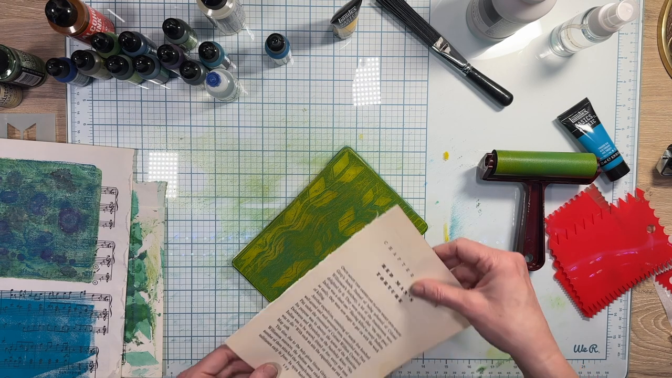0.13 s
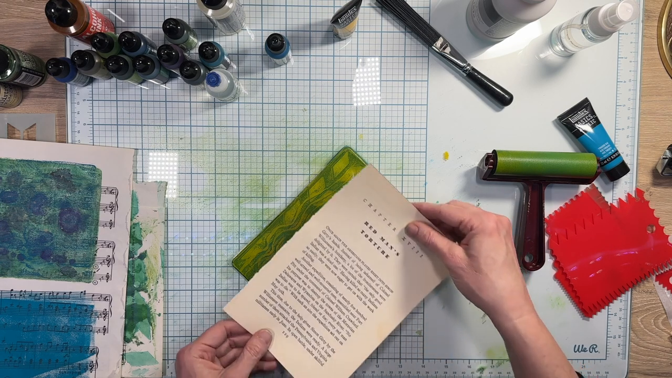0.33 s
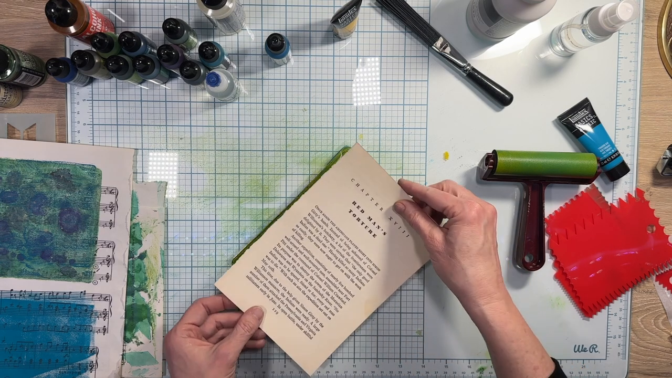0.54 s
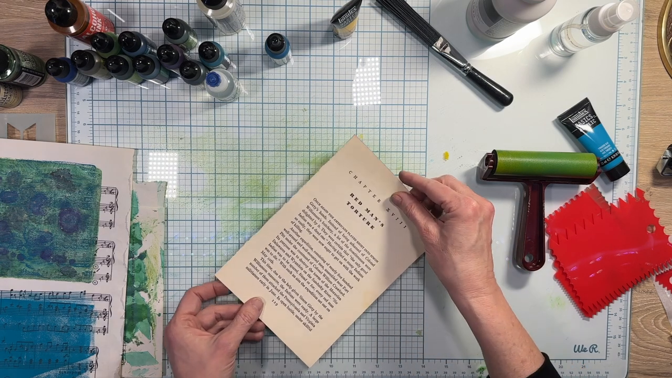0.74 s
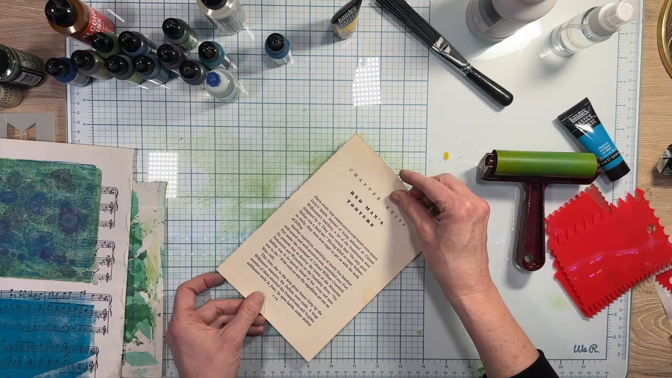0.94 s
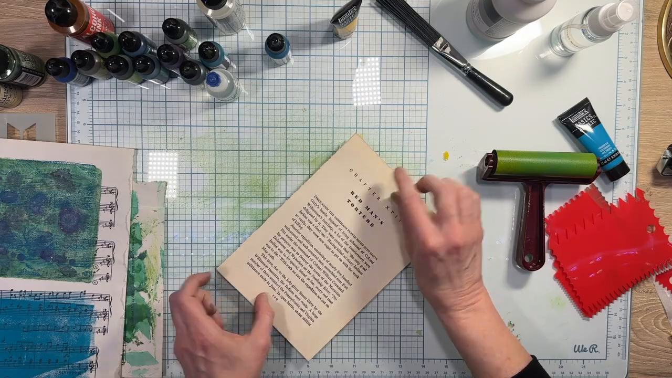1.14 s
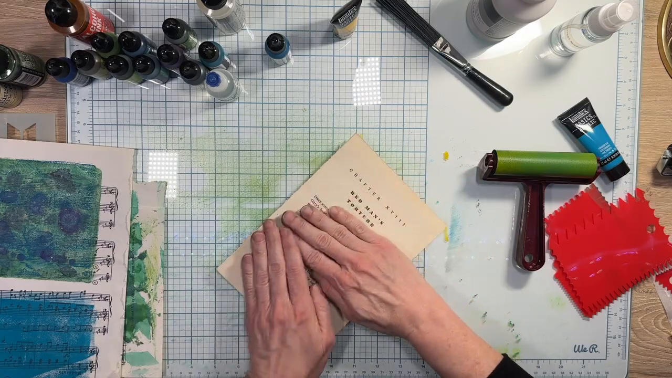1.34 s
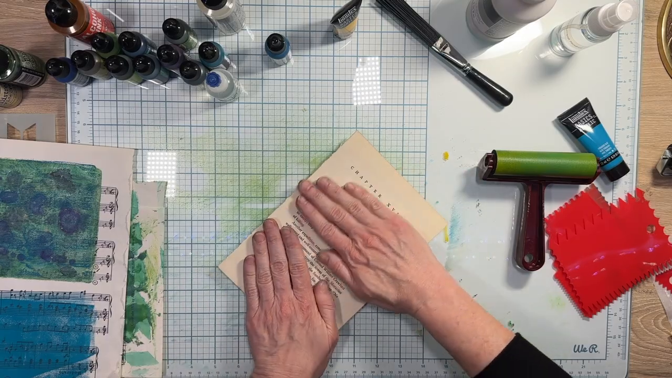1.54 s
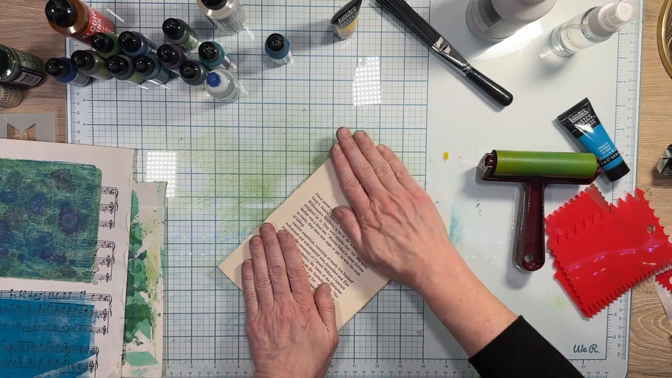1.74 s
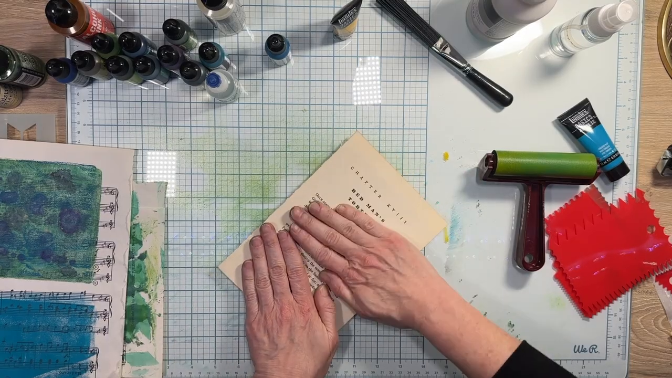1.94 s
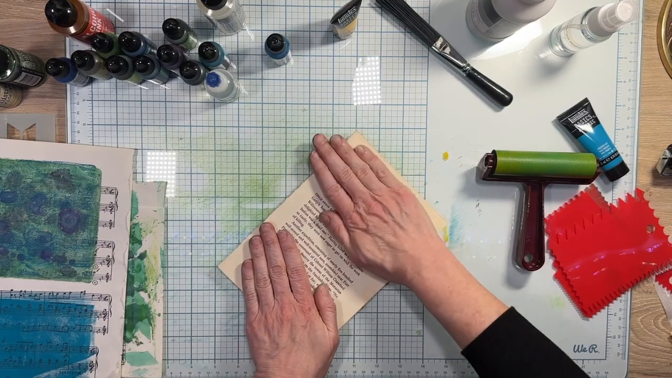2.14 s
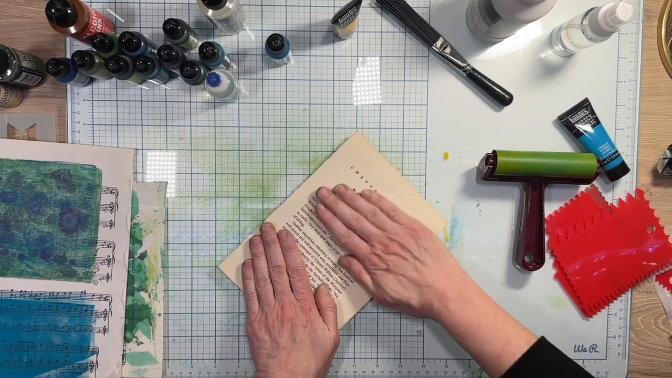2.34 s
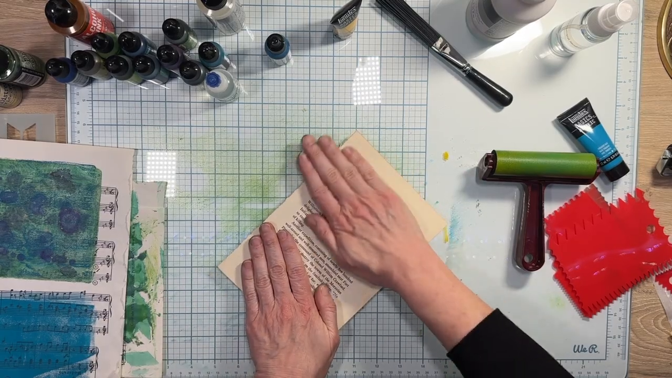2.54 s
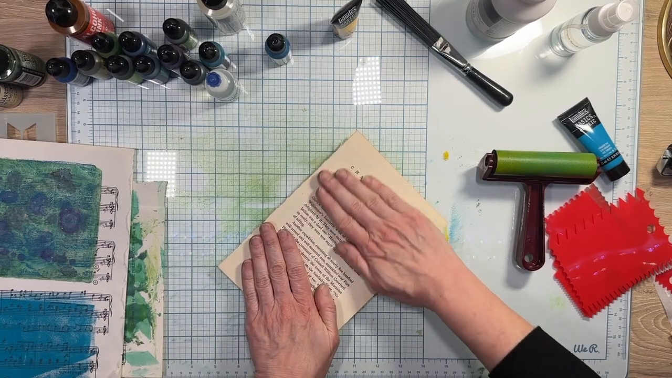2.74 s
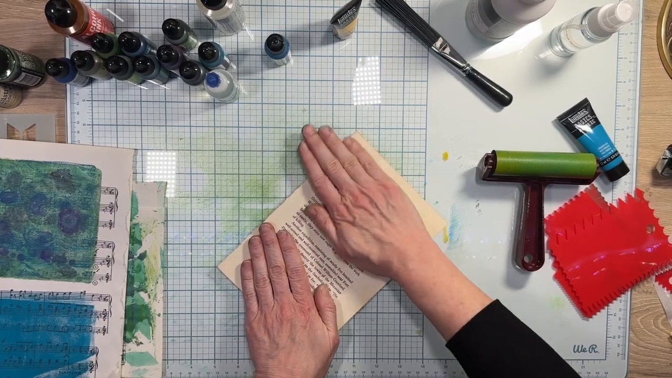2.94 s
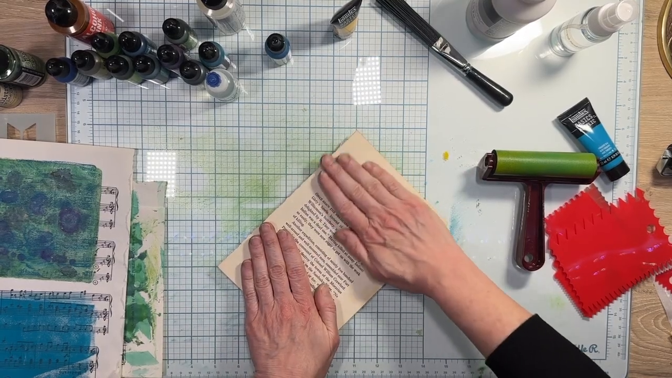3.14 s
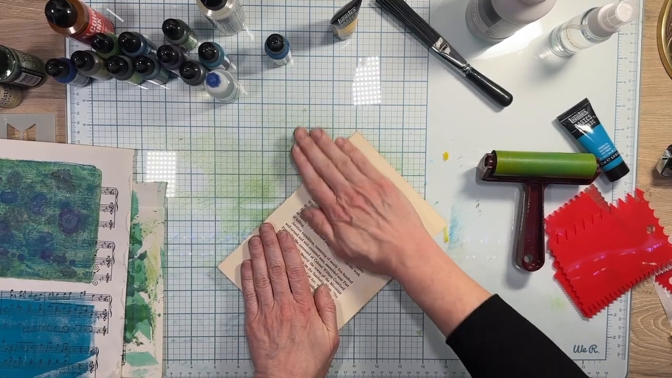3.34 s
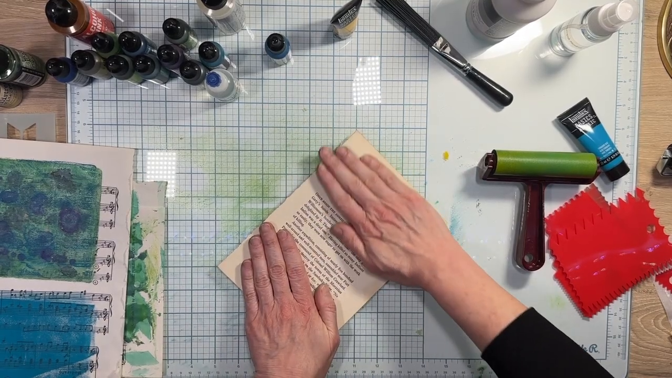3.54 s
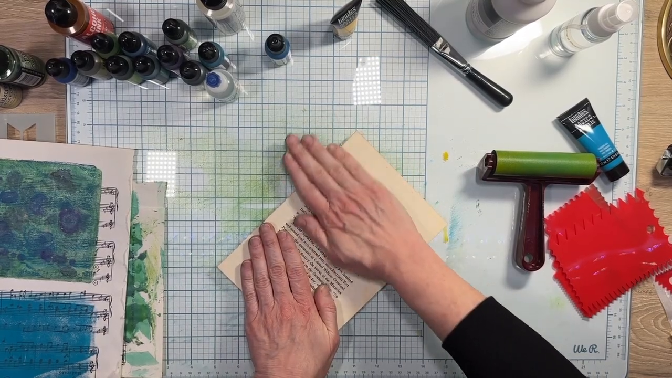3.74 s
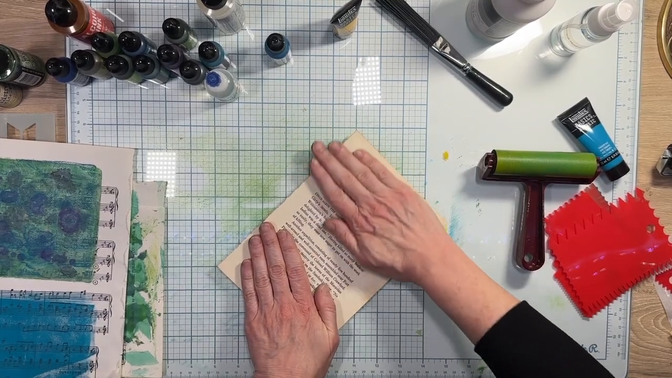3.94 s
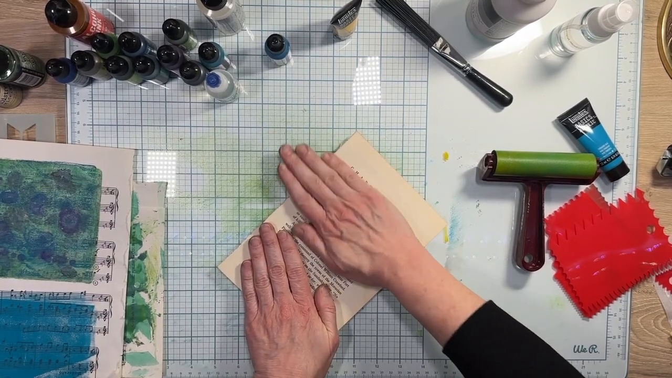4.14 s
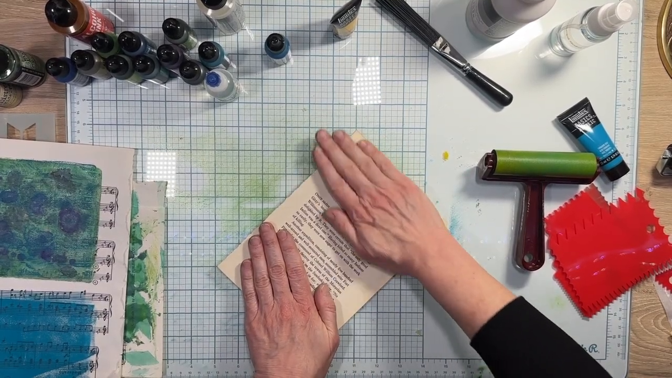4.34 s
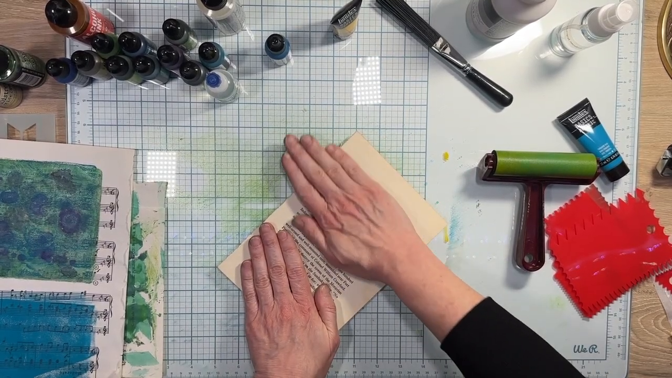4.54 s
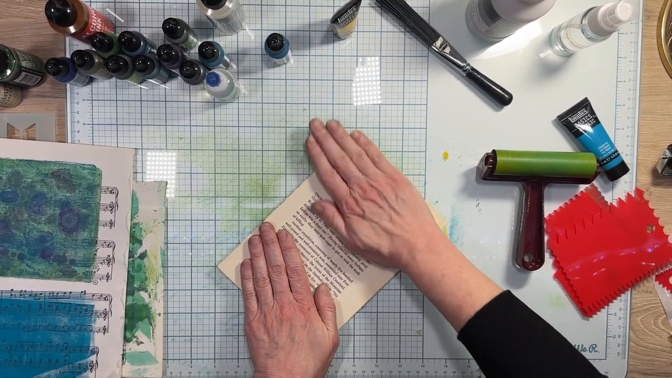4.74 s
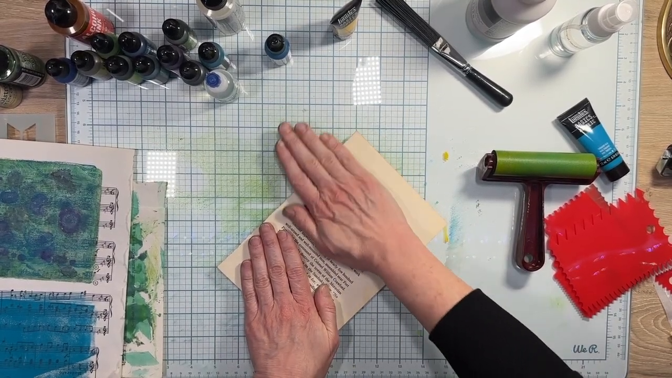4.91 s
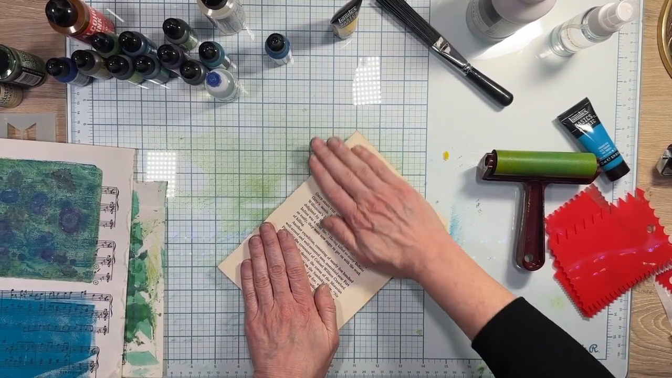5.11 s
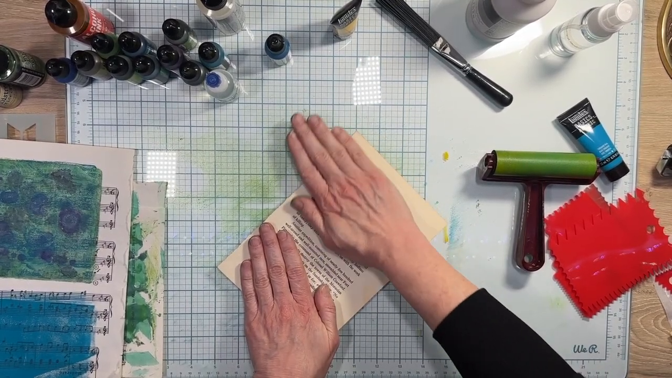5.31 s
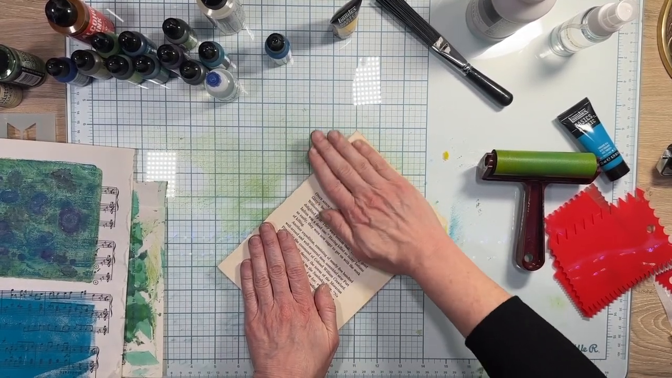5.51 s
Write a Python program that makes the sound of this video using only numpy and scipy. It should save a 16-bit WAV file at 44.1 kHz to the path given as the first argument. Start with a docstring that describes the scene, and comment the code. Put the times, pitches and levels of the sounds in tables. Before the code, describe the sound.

Paper flexes and swishes onto a table, followed by a soft thump and quick, steady strokes of a hand rubbing over the page.

```python
"""In a small room, at a craft table, a book page is laid on an inked printing plate.
The sheet buckles with a hollow pop, slides into place and flicks off a fingertip.
Both hands land and the table thumps. Then one palm rubs to and fro over the paper:
countless fibres slip, making a dry hiss that swells and brightens with every stroke."""
import sys
import numpy as np
from scipy import signal
from scipy.fft import rfft, irfft, next_fast_len
from scipy.io import wavfile
from scipy.ndimage import uniform_filter1d

SR = 44100
rng = np.random.default_rng(int(sys.argv[2]) if len(sys.argv) > 2 else 0)


def put_to_file(sound):
    """Save the sound as 16-bit audio at rate SR, in the file named by the first command-line argument."""
    columns = np.atleast_2d(sound).T  # one column per channel
    safe = np.clip(columns, -1, 1)
    whole_steps = np.round(safe * 32767)
    wavfile.write(sys.argv[1], SR, whole_steps.astype(np.int16))


N = 249945

# the palm's strokes, each lasting until the next: (start [s], fastest point [share of stroke],
# friction [dB], fine hiss [dB], dull rush [dB], friction at the opening turn [dB],
# time at full speed [share], rest at either end [s])
STROKES = [(1.464, 0.74, -51.5, -48.5, -63, -66.5, 0.51, 0.0097),
           (1.729, 0.7, -49.5, -45.5, -60, -66.5, 0.33, 0.015),
           (1.946, 0.43, -48.5, -45, -60, -62, 0.17, 0.015),
           (2.154, 0.4, -48.5, -46, -59, -65, 0.13, 0.014), (2.342, .49, -51, -44.8, -63, -55.5, .15, .008),
           (2.578, 0.25, -52, -47.5, -60.5, -52, .1, .008),
           (2.74, 0.51, -50.8, -43.5, -60.5, -51.5, 0.14, .008), (2.936, .42, -49, -47, -61, -55, .1, .008),
           (3.118, 0.4, -51, -44.4, -63.5, -53.5, .1, 0.0088),
           (3.322, 0.43, -50, -49, -62.5, -53, .1, .008), (3.505, .38, -50.5, -43, -62.5, -53.5, .1, .008),
           (3.696, 0.27, -48.5, -49.5, -62, -50.5, .1, .008),
           (3.89, .32, -50, -45.5, -62.5, -53.5, 0.093, .008),
           (4.15, 0.42, -51, -49.5, -62.5, -51, .1, .008),
           (4.287, .34, -50.5, -45.5, -64, -52.5, .1, 0.0066),
           (4.486, 0.51, -51.5, -52.5, -62.5, -51, .1, 0.007),
           (4.68, 0.27, -49.5, -45.5, -64, -55.5, 0.082, 0.014),
           (4.88, 0.29, -50, -55, -63, -50.5, 0.11, 0.0074),
           (5.075, 0.34, -50, -45.5, -66, -52.5, 0.082, 0.011),
           (5.263, 0.23, -49.5, -51.5, -64, -51.5, .1, .008), (5.485, 0.34, -50, -48, -63, -55, .1, 0.0071)]
# tone of the palm's friction: (pitch [Hz], level [dB])
FRICTION_TONE = [(300, -37), (1200, -11.5), (2000, -10), (2800, -1.2), (3500, 0), (4750, -0.5),
                 (5900, -3.5), (7200, -1.3), (8050, -1), (8700, -4), (9500, -4.5), (16000, -15.5)]
# tone of the fine, bright hiss: (pitch [Hz], level [dB])
HISS_TONE = [(2000, -27), (6000, -5.5), (8100, -2), (8800, -3), (10000, 0), (11200, 1.5), (12500, -1.5),
             (14500, -1), (16000, -7)]
# tone of the flat hand's dull rush: (pitch [Hz], level [dB])
PALM_TONE = [(100, -16), (220, -7.5), (340, -9.5), (470, -18), (670, -35), (880, -7.5), (1200, -6),
             (1700, 5), (2200, 6), (3000, -5.5), (6000, -17.5)]
# side compared with middle, by pitch; from 10 to 14 kHz the side all but vanishes, at the very top it returns:
# # (pitch [Hz], side compared with middle [dB])
STEREO_WIDTH = [(60, -20), (300, -11), (800, -4.5), (2200, -10.5), (4400, -6.5), (5900, -4.5), (7700, -7),
                (8600, -11.5), (10000, -32.5), (13500, -63), (15500, 5)]
# how heavily the hand leans: (time [s], table rumble [dB], room ring [dB])
LEANING = [(1.6, -102, -79), (1.9, -77.5, -84), (2.35, -99, -75.5), (2.9, -77.5, -79.5),
           (4.3, -83.5, -74.5), (5.0, -78.5, -69.5), (5.67, -83, -77.5)]
# faint, fixed room resonances that colour the rubbing: (pitch [Hz], width [Hz], level [dB])
ROOM_NOTES = [(565, 42, 0), (689, 23, 8), (887, 21, 5), (1024, 110, -3), (1194, 130, 3.5)]
# snaps of the buckling sheet: (time [s], level [dB], treble limit [Hz])
BUCKLES = [(.0055, -37, 700), (0.0183, -34.5, 650), (.035, -39.5, 700), (0.055, -53, 696),
           (0.1133, -34.5, 2390), (.1183, -26, 2410), (0.124, -46.5, 2410)]
# hollow notes of the pop, as the room colours it: (pitch [Hz], level [dB], time to fade by 60 dB [s])
POP_NOTES = [(344, -3, 0.072), (470, -5.5, 0.068), (547, -2.5, 0.1), (654, -8.5, 0.11), (836, 7, 0.05),
             (971, 2.5, 0.069), (1009, 2, 0.048), (1167, 0, 0.085), (1366, 3, 0.041), (1510, -5, 0.11),
             (1660, -11.5, 0.088), (1886, -8, 0.074), (1936, -10, 0.075), (2340, -10.5, 0.05),
             (2640, -7.5, 0.062)]
# the loose sheet flaps against the air: (time [s], level [dB], fade time [s])
FLAPS = [(0, -40.5, 0.031), (0.024, -48.5, 0.026), (0.112, -41, .006), (0.1173, -37, 0.0078),
         (0.132, -56, 0.0353)]
# tone of a flap: (pitch [Hz], level [dB])
FLAP_TONE = [(60, -23.5), (125, -11.5), (190, -15.5), (280, -3), (550, -2), (930, -1.5), (1400, -17),
             (2000, -14), (3200, -21), (4000, -35.5)]
# slides of the sheet, and of the fingers over it:
# (start [s], length [s], fastest point [share of slide], swish [dB], fingers [dB])
SLIDES = [(-.06, 0.11, 0.78, -63, -51.5), (0.006, 0.16, 0.32, -70, -48.5), (0.122, 0.28, 0.16, -61.5, -54),
          (0.215, 0.28, 0.7, -57.5, -58), (0.453, 0.16, 0.45, -56, -64), (0.596, 0.12, 0.3, -60, -80),
          (0.743, 0.1, 0.65, -60.5, -70.5), (0.861, 0.086, 0.39, -61.5, -65.5),
          (0.981, 0.12, 0.66, -57, -53), (1.08, 0.07, 0.61, -84.5, -60.5), (1.13, 0.073, .3, -91, -74.5),
          (1.227, .055, 0.44, -90, -80), (1.347, 0.15, 0.37, -67, -54.5)]
# the air gap under the sheet closes, so its note climbs: (time [s], pitch [Hz])
AIR_GAP = [(0, 900), (.17, 1120), (.3, 1230), (.52, 1410), (.66, 1440), (.8, 1990), (.92, 2517),
           (1.05, 3010), (1.2, 3000)]
# breathy, rising whistle of the sheet's edge: (time [s], pitch [Hz], level [dB])
WHISTLE = [(0, 3400, -82), (.13, 3600, -75), (.19, 4000, -63), (.25, 4300, -63), (.3, 4540, -68),
           (.34, 5250, -66), (.4, 5750, -65), (.47, 5900, -88), (.6, 5900, -130)]
# tone of fingers sliding on paper: (pitch [Hz], level [dB])
FINGER_TONE = [(300, -25), (900, -23), (1400, -5), (2000, -5), (4200, -2), (7000, 0.5), (9200, -2.5),
               (11300, 1.5), (14000, -5.5), (16000, -6)]
# the corner springs off a fingertip: (time [s], level [dB], treble limit [Hz], bass limit [Hz])
FLICKS = [(1.0598, -44, 8000, 2800), (1.0633, -41, 5000, 1900), (1.0672, -39, 1500, 900)]
# notes of the page's corner: (pitch [Hz], level [dB], time to fade by 60 dB [s])
CORNER_NOTES = [(1415, -0.5, 0.044), (1900, -26, 0.032), (2420, -5.5, 0.025), (2800, -1.5, 0.042),
                (3350, 0, .025), (4430, -4.5, 0.022), (6300, -7, 0.0069), (10200, -8, .005)]
# fingertips touch the page: (time [s], level [dB], fade time [s], treble limit [Hz])
TOUCHES = [(0.764, -44, .007, 3500), (1.0595, -43, 0.0078, 11900), (1.063, -43, 0.0095, 7000),
           (1.343, -54.5, 0.016, 17900), (1.355, -42.5, 0.013, 7000), (1.372, -43, .005, 2500),
           (1.386, -38.5, 0.0072, 9000), (1.391, -45, 0.014, 2000)]
# notes of the page lying on the plate: (pitch [Hz], width [Hz], level [dB])
PAGE_NOTES = [(181, 100, -13.5), (376, 97, -6.5), (690, 480, -11.5), (1440, 83, 1), (1850, 110, 3.5),
              (2870, 790, -2), (5520, 4000, -8), (11620, 4600, -1.5)]
# the page is flattened by its own spring, then by the hands: (time [s], level [dB], fade time [s])
PATS = [(1.067, -55, 0.0094), (1.078, -62, .016), (1.362, -68, .016), (1.375, -63, 0.018),
        (1.398, -73, 0.012)]
# tone of a pat: (pitch [Hz], level [dB])
PAT_TONE = [(90, -17), (180, 2), (330, -4.5), (550, -4), (900, -5), (1600, -10), (4000, -45)]
# the hands' weight lands on the table: (time [s], level [dB], push length [s])
THUMPS = [(0.02, -54, 0.0038), (0.13, -56, 0.0045), (1.383, -48, 0.009), (1.411, -41.5, 0.0033),
          (1.44, -36.5, 0.0058), (1.546, -53.5, 0.0069), (1.918, -62, 0.0044), (1.986, -58, 0.0067),
          (2.148, -61, .006)]
# echoes off the mat, bottles and tools: (delay [s], level [dB])
ECHOES = [(.00045, -12.5), (.00082, -14.5), (.00168, -18), (.0025, -26.5), (.00356, -17), (.00405, -12.5),
          (.0052, -17), (.0071, -17.5)]
# tone of the room's quiet background: (pitch [Hz], level [dB])
ROOM_TONE = [(20, -28), (40, 3), (65, 5), (130, 1), (300, -9.5), (600, -15), (1000, -20.5), (1600, -7),
             (2500, -18), (5000, -22), (8500, -26), (11500, -17), (16000, -18.5)]
# how far the left microphone opening leads the right: (pitch [Hz], phase [radians])
LEFT_LEAD = [(30, 0), (2000, 0), (3500, .85), (5300, .5), (5800, -.1), (7000, 1.3), (7700, 2.55),
             (8200, 2.7), (8450, .5), (9200, .2), (10500, 0)]
# how much louder the left opening is: (pitch [Hz], level [dB])
LEFT_BOOST = [(100, .7), (1800, .6), (2900, 2.1), (3700, 1.1), (5000, 1.9), (7600, 1.5), (9500, 0)]

RUB_END_S = 5.7
FRICTION_POWER, HISS_POWER, SLIDE_POWER = 1.57, 1.62, 1.43   # loudness grows as speed to this power
HISS_FADE_DB_PER_S = 35   # the bright hiss dies away after a stroke's fastest point
CREEP_END_S, CREEP_FADE_DB_PER_S = 0.95, 131   # the held sheet never quite rests; let go, it settles
TABLE_HZ, TABLE_RING_S, ROOM_RING_S = 62, .18, 0.22   # ring times are for a 60 dB fade


def rubbing(speed):
    """The palm drags on the page: friction, a bright hiss that bites and fades, and a dull rush."""
    start, peak, friction_db, hiss_db, palm_db, *_, length = current_stroke()
    turn_times, *_, turn_db, _, _ = np.transpose(STROKES)
    t = np.arange(N) / SR
    at_turn = from_db(np.interp(t, turn_times, turn_db))
    past_peak_s = np.maximum(t - start - peak * length, 0)
    drag = speed ** FRICTION_POWER
    bite = speed ** HISS_POWER * from_db(-HISS_FADE_DB_PER_S * past_peak_s)
    full_friction = from_db(friction_db)
    friction_gain = at_turn * (1 - drag) + full_friction * drag
    hiss_gain = at_turn * from_db(1.5) * (1 - bite) + from_db(hiss_db) * bite
    palm_gain = from_db(palm_db) * (friction_gain / full_friction) ** 0.63   # swells less than friction
    friction = friction_gain * toned(slips(per_s=1500, catch_db=-13, flutter_db=.5), FRICTION_TONE)
    hiss = hiss_gain * toned(slips(per_s=1300, catch_db=-10, flutter_db=.5), HISS_TONE)
    palm = palm_gain * toned(slips(per_s=460, catch_db=-4.5, flutter_db=1), PALM_TONE)
    waver = from_db(0.63 * drift(7.9))
    return within(turn_times[0], RUB_END_S) * waver * (friction + hiss + palm)


def hand_speed():
    """The hand speeds up and slows down in each stroke, resting briefly at each turn."""
    start, peak, *_, hold, rest, length = current_stroke()
    return movement(start + rest, length - 2 * rest, peak, hold)


def current_stroke():
    """At every sample, the row of the stroke under way, then its length."""
    starts = np.array(STROKES)[:, 0]
    rows = np.column_stack([STROKES, np.diff(starts, append=RUB_END_S)])
    under_way = np.maximum(np.searchsorted(starts, np.arange(N) / SR) - 1, 0)
    return rows[under_way].T


def slips(per_s, catch_db, flutter_db, side_db=0):
    """Friction: countless fibres slip, some catch harder (per_s), and the skin grips unevenly."""
    middle, side = rng.standard_normal((2, N))
    caught = rng.random(N) < per_s / SR
    sizes = from_db(4 * np.minimum(rng.exponential(1, N), 4))
    catches = caught * sizes * rng.choice([-1, 1], N)
    middle = unit_level(middle + from_db(catch_db) * unit_level(catches))
    side = from_db(side_db) * shape_tone(side, STEREO_WIDTH) * [[1], [-1]]
    return (middle + side) * from_db(flutter_db * drift(26))


def leaning(speed):
    """The dragging hand shakes the table, most as it turns; faint room resonances colour the rub."""
    table_db, room_db = over_time(LEANING)
    turning = 1 - speed
    drag = slips(per_s=400, catch_db=-4.5, flutter_db=3.5)
    table = unit_level(resonate(drag, [(TABLE_HZ, 16, 0), (50, 14, -9), (325, 70, -18)]))
    room_ring = unit_level(resonate(drag, ROOM_NOTES))
    both = from_db(table_db + 4 * turning) * table + from_db(room_db - 0.5 * turning) * room_ring
    return within(STROKES[0][0], RUB_END_S) * both


def buckling():
    """Each snap of the bending sheet makes a hollow, room-coloured pop, inside the slap of its flapping."""
    pops = high_pass(from_db(-6) * strike(BUCKLES, POP_NOTES), hz=303)   # a small sheet has little bass
    flaps = sum(contact(*flap) for flap in FLAPS)
    return pops + flaps * toned(slips(per_s=800, catch_db=-1, flutter_db=2, side_db=-4), FLAP_TONE)


def sliding():
    """The sheet slides over the plate in short pushes; its swish rings in the narrowing air gap."""
    creep = from_db(-CREEP_FADE_DB_PER_S * np.maximum(np.arange(N) / SR - CREEP_END_S, 0))
    swish_gain, fingers_gain = from_db(-74) * creep, from_db(-75) * creep
    for start, length, peak, swish_db, fingers_db in SLIDES:
        push = movement(start, length, peak) ** SLIDE_POWER
        swish_gain = np.hypot(swish_gain, from_db(swish_db) * push)
        fingers_gain = np.hypot(fingers_gain, from_db(fingers_db) * push)
    gap_hz, = over_time(AIR_GAP)
    whistle_hz, whistle_db = over_time(WHISTLE)
    scrape = slips(per_s=770, catch_db=-5.5, flutter_db=1, side_db=-11)
    scrape *= from_db(2 * drift(10))   # the sheet catches and lets go
    swish = sweep(sweep(scrape, gap_hz, share=1), gap_hz, share=1) / np.sqrt(gap_hz)
    swish = low_pass(swish, hz=4690)   # the sheet muffles the gap
    swish = unit_level(high_pass(swish, hz=800))   # thin paper gives off little bass
    whistle = unit_level(sweep(sweep(scrape, whistle_hz, share=.09), whistle_hz, share=.09))
    fingers = toned(slips(per_s=830, catch_db=-8.5, flutter_db=1), FINGER_TONE)
    return swish_gain * swish + fingers_gain * fingers + from_db(whistle_db) * whistle


def flicking():
    """The page's corner springs off a fingertip: dry cracks, ringing lower as more paper comes free."""
    rings = cracks = 0
    for start, db, treble_hz, bass_hz in FLICKS:
        rings += high_pass(strike([(start, db, treble_hz)], CORNER_NOTES), bass_hz)
        scuff = slips(per_s=3000, catch_db=-2.5, flutter_db=-1)
        cracks += low_pass(contact(start, db - 2, fade_s=.0018) * scuff, hz=6500)
    return rings + high_pass(cracks, hz=2100)


def touching():
    """Each touch is a brief scuff that rings the page; the fleshier the contact, the duller."""
    scuff = slips(per_s=2200, catch_db=-3.5, flutter_db=3)
    force = sum(low_pass(contact(start, db, fade_s) * scuff, hz) for start, db, fade_s, hz in TOUCHES)
    return from_db(-1) * resonate(force, PAGE_NOTES)


def patting():
    """Air squeezed out from under the page makes a low pat."""
    force = sum(contact(*pat) for pat in PATS)
    return force * toned(slips(per_s=1000, catch_db=-8.5, flutter_db=3.5), PAT_TONE)


def thumping():
    """Soft pushes rock the table top, which gives off little below its own note."""
    t = np.arange(N) / SR
    force = 0
    for start, db, length in THUMPS:
        push = np.sin(np.pi * np.clip((t - start) / length, 0, 1)) ** 2
        force += from_db(db) * push * 2 / (length * SR)
    return high_pass(ring(force, TABLE_HZ, TABLE_RING_S), hz=42)


def add_echoes(x, sway_s):
    """Nearby things reflect the treble; as hands and sheet move, the paths change and the tone shifts."""
    treble = high_pass(x, hz=1300)
    samples, total, power = np.arange(N), x, 1
    for delay, db in ECHOES:
        earlier = samples - (delay + sway_s * drift(1)) * SR
        total = total + from_db(db) * np.array([np.interp(earlier, samples, side) for side in treble])
        power += from_db(db) ** 2 / 2
    return total / np.sqrt(power)


def wall_reverb(x, wall_hz, size=16384):
    """The walls add a short, dull tail, different at each side, with little deep bass."""
    t = np.arange(size) / SR
    tail = low_pass(rng.standard_normal((2, size)), wall_hz)
    tail = tail * np.exp(-np.log(1000) * t / ROOM_RING_S) * (t > .005)
    tail = tail / np.sqrt(np.sum(tail ** 2) / 2 * SR / (2 * wall_hz))   # gain 1 below wall_hz
    return signal.fftconvolve(x, high_pass(tail, hz=150), axes=1)[:, :N]


def room_air():
    """The room's faint, steady rumble and hiss, mostly the same at both sides."""
    noise = rng.standard_normal(N) + from_db(-6.5) * rng.standard_normal((2, N))
    return from_db(-74) * toned(noise, ROOM_TONE)


def microphone(x):
    """The two microphone openings hear the treble out of step, the left one a little louder."""
    size = next_fast_len(N)
    hz = np.arange(size // 2 + 1) * SR / size
    lead = np.interp(hz, *np.transpose(LEFT_LEAD))
    boost_db = np.interp(hz, *np.transpose(LEFT_BOOST))
    left = np.exp(1j * lead / 2) * from_db(boost_db / 2)
    return irfft(rfft(x, size) * np.array([left, 1 / left]), size)[:, :N]


def movement(start, length, peak, hold=0):
    """Speed of one movement: from rest up to 1, held around its peak, and back to rest."""
    progress = (np.arange(N) / SR - start) / length
    peak = np.clip(peak, .05, .95)
    ramp = np.minimum(progress / peak, (1 - progress) / (1 - peak)) / (1 - np.clip(hold, 0, .9))
    return np.sin(np.pi / 2 * np.clip(ramp, 0, 1))


def contact(start, db, fade_s):
    """Force of one contact: sudden, then dying away."""
    t = np.arange(N) / SR - start
    return from_db(db) * (t >= 0) * np.exp(-np.abs(t) / fade_s)


def strike(snaps, notes):
    """Softened clicks set notes ringing; every second note's wave is flipped."""
    force = np.zeros(N)
    for start, db, treble_hz in snaps:
        click = np.zeros(N)
        click[max(round(start * SR), 0)] = from_db(db)
        force += low_pass(click, treble_hz)
    return sum((-1) ** k * from_db(db) * ring(force, hz, ring_s)
               for k, (hz, db, ring_s) in enumerate(notes))


def ring(clicks, hz, ring_s):
    """Each click starts a pure note that fades by 60 dB in ring_s."""
    decay, angle = np.exp(-np.log(1000) / (ring_s * SR)), 2 * np.pi * hz / SR
    return signal.lfilter([0, np.sin(angle)], [1, -2 * decay * np.cos(angle), decay ** 2], clicks + 1e-18)


def resonance(hz, width):
    """Filter numbers that let through a band around one pitch."""
    r = np.exp(-np.pi * width / SR)
    return (1 - r * r) / 2 * np.array([1, 0, -1]), [1, -2 * r * np.cos(2 * np.pi * hz / SR), r * r]


def resonate(x, notes):
    """A set of notes rings along with x; every second note's wave is flipped."""
    return sum((-1) ** k * from_db(db) * signal.lfilter(*resonance(hz, width), x + 1e-18)
               for k, (hz, width, db) in enumerate(notes))


def sweep(x, hz, share, size=256):
    """A moving resonance whose width is a share of its pitch."""
    swept, state = np.zeros_like(x), np.zeros((2, 2))
    for i in range(0, N, size):
        band = resonance(hz[i], share * hz[i])
        swept[:, i:i + size], state = signal.lfilter(*band, x[:, i:i + size], zi=state)
    return swept


def shape_tone(x, tone):
    """Turn each pitch up or down to follow a tone table."""
    hz, db = np.transpose(tone)
    size = next_fast_len(N)
    pitches = np.maximum(np.arange(size // 2 + 1) * SR / size, 1)
    gain = from_db(np.interp(np.log(pitches), np.log(hz), db))
    return irfft(rfft(x, size) * gain, size)[..., :N]


def toned(x, tone):
    """Give a sound a tone and an average level of 1."""
    return unit_level(shape_tone(x, tone))


def low_pass(x, hz):
    """Soften the treble above hz."""
    return signal.sosfilt(signal.butter(2, min(hz, SR / 2 - 1), fs=SR, output="sos"), x + 1e-18)


def high_pass(x, hz):
    """Thin out the bass below hz."""
    return signal.sosfilt(signal.butter(2, hz, "high", fs=SR, output="sos"), x + 1e-18)


def drift(hz):
    """A slow random wobble of typical size 1; higher hz wobbles faster."""
    r = np.exp(-80 * np.pi * hz / SR)
    slow = signal.lfilter([1], [1, -2 * r, r * r], rng.standard_normal(N // 40 + 2002))[2000:]
    return np.interp(np.arange(N) / 40, np.arange(len(slow)), unit_level(slow))


def over_time(rows):
    """Join a table's timed points with lines, one curve per column."""
    times, *columns = np.transpose(rows)
    return [np.interp(np.arange(N) / SR, times, column) for column in columns]


def within(start, end):
    """1 from start to end, fading quickly outside."""
    t = np.arange(N) / SR
    return uniform_filter1d(1. * ((t >= start) & (t <= end)), size=600)


def unit_level(x):
    """Scale to an average (rms) level of 1."""
    return x / np.sqrt(np.mean(x ** 2) + 1e-20)


def from_db(db):
    """Turn decibels into a multiplier."""
    return 10 ** (np.asarray(db) / 20)


def scene():
    """Paper and hands a little to the left, with the room around them."""
    speed = hand_speed()
    snaps = buckling() + flicking()
    hands = add_echoes(rubbing(speed) + sliding(), sway_s=0.000165)
    hands = hands + leaning(speed) + touching() + patting() + thumping()
    air = room_air()
    walls = wall_reverb(from_db(-12) * hands + from_db(-13) * snaps, wall_hz=4090)
    return microphone(hands + snaps + walls) + air


def record(dry):
    """The treble above 15900 Hz is cut steeply."""
    return signal.sosfilt(signal.ellip(12, .1, 70, 15900, fs=SR, output="sos"), dry)


dry = scene()
out = record(dry)
put_to_file(out)
```